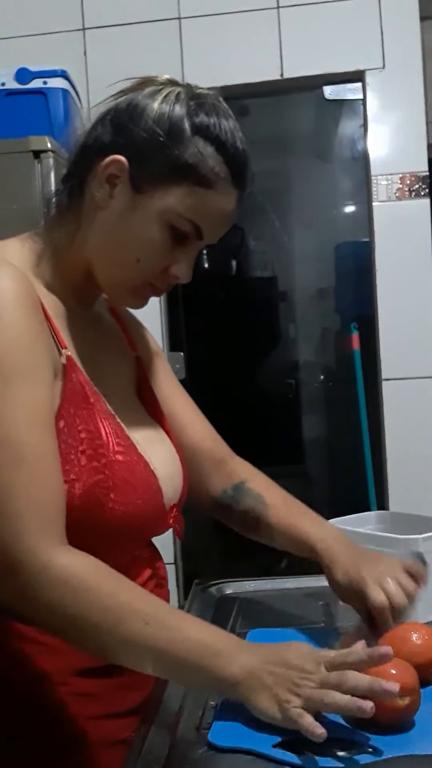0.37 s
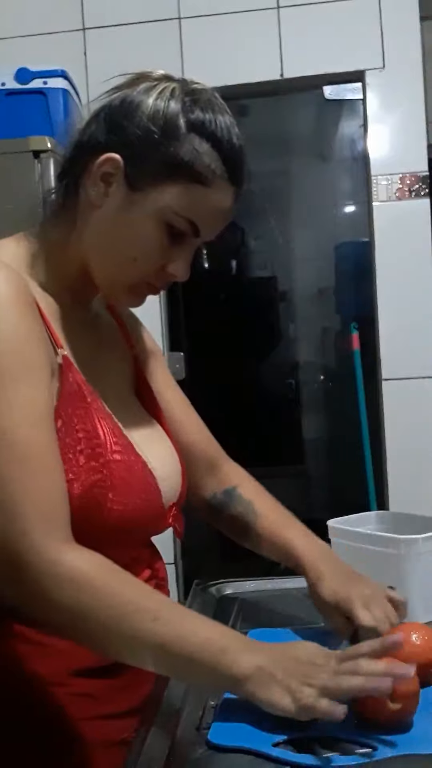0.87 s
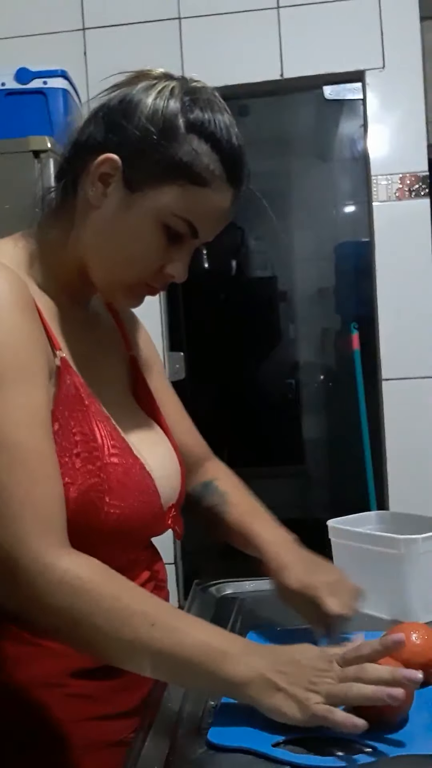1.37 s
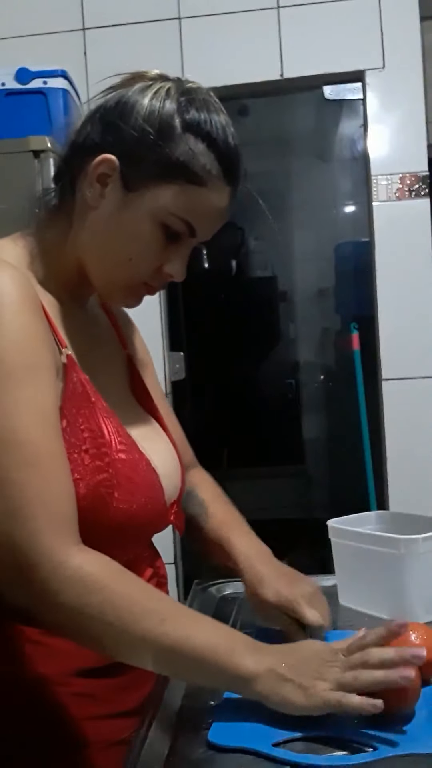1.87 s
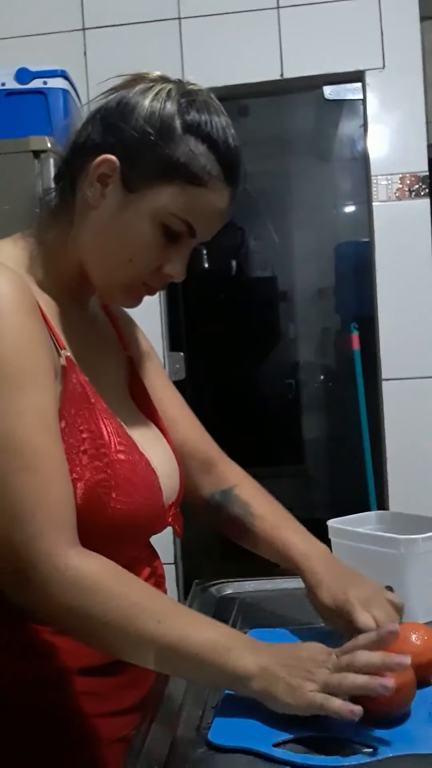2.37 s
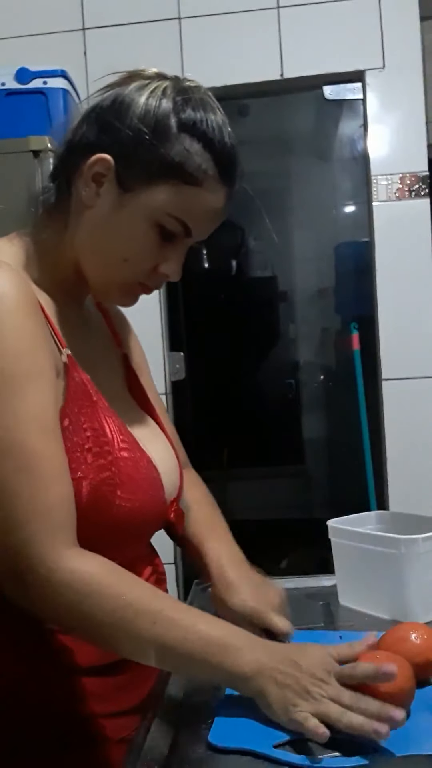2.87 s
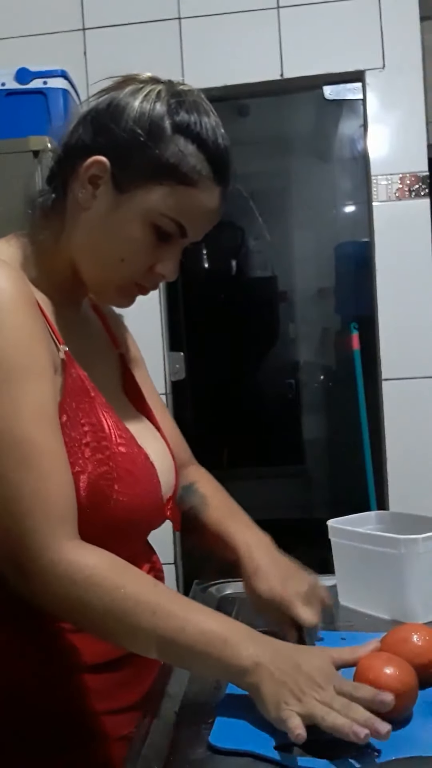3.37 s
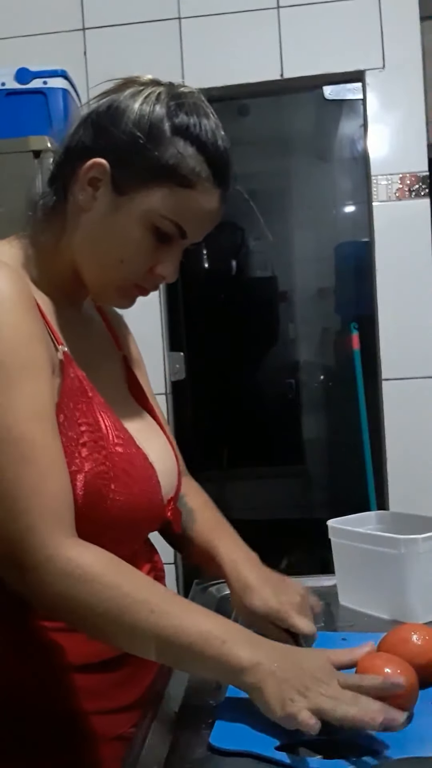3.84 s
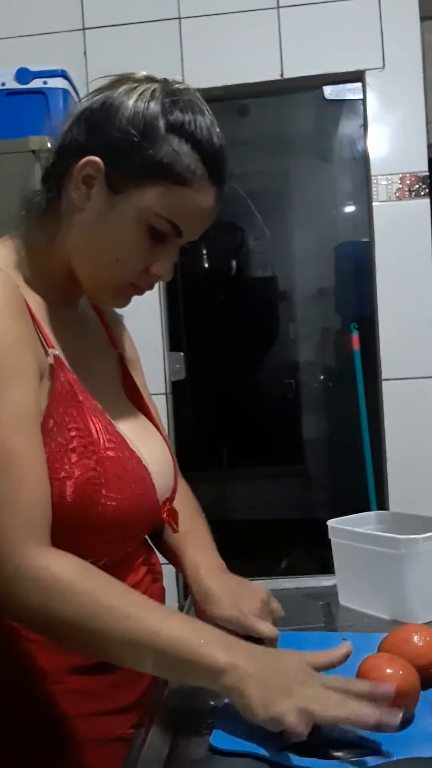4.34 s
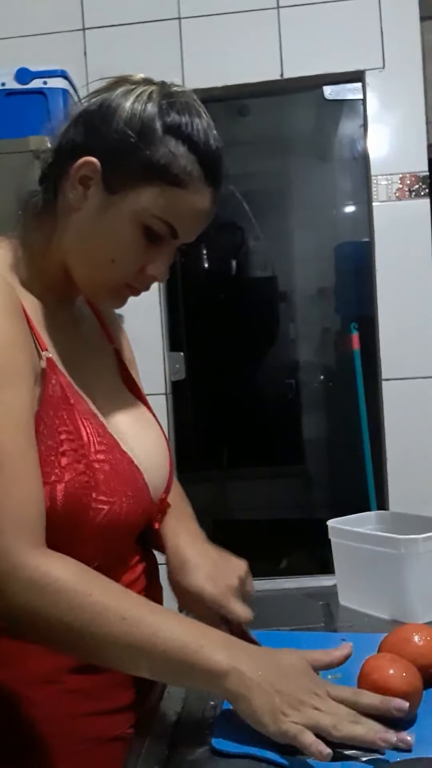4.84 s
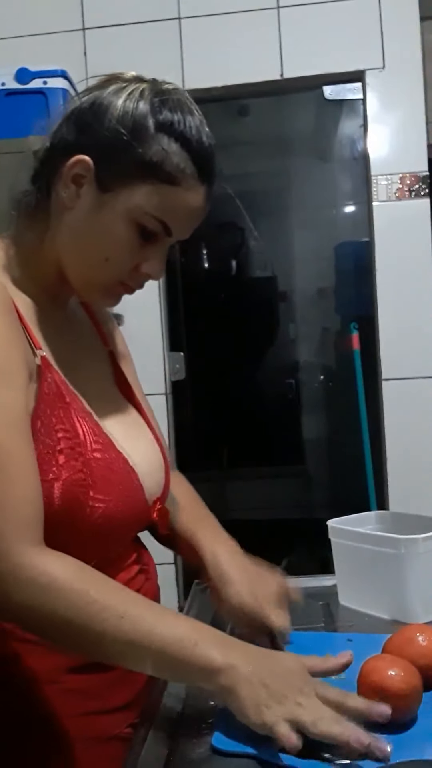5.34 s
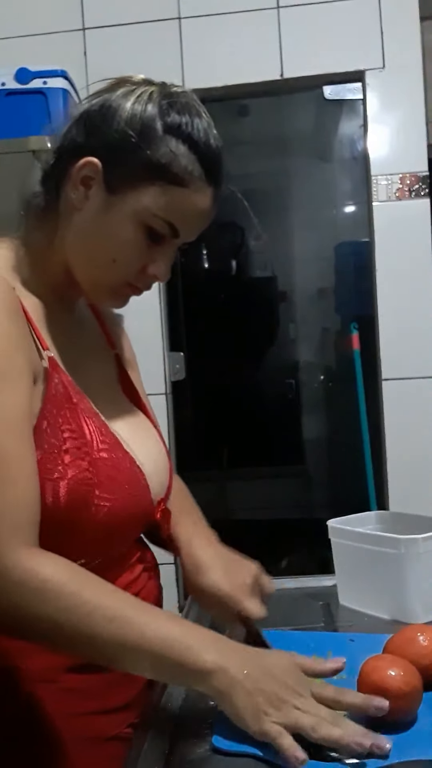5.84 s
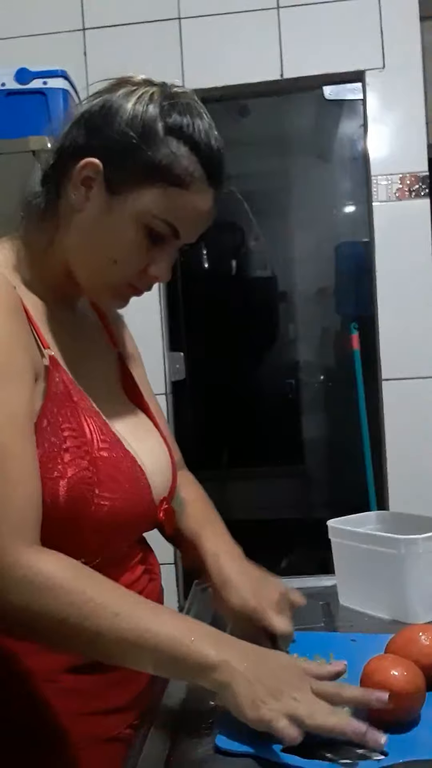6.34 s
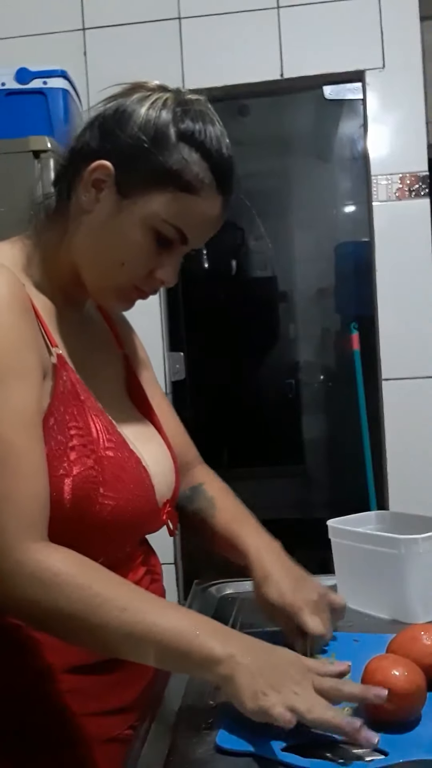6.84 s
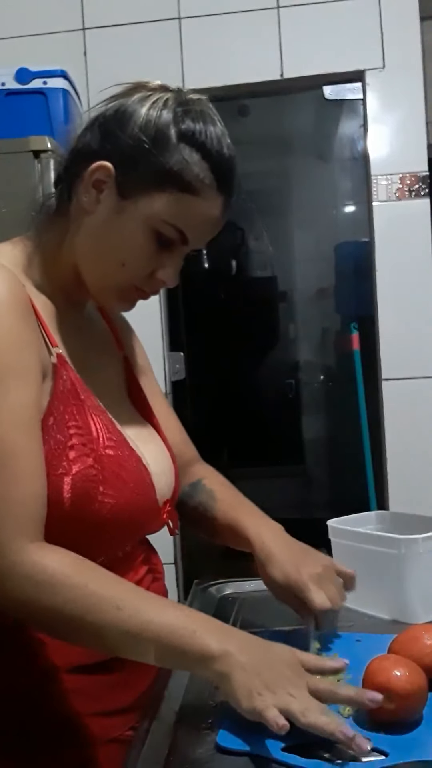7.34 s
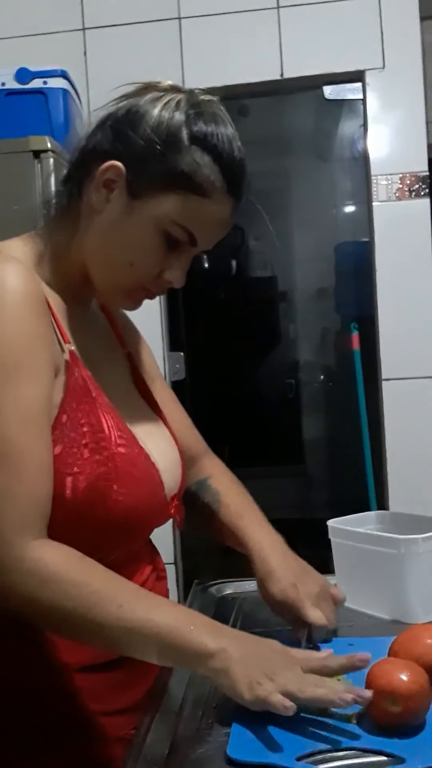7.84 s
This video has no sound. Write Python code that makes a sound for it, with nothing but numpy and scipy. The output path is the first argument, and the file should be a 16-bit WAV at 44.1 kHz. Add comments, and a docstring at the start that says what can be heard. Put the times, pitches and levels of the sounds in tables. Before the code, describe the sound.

Steady close knife chops click and crunch on a plastic cutting board that knocks on a hollow metal sink top in a small tiled kitchen.

```python
"""A knife chops herbs on a thin plastic board lying on a steel sink top, in a small tiled kitchen.
Edge: runs of clicks crack on the board and wake its modes; swelling grains crunch through leaves.
Sink top: the board knocks on the steel, which booms in decaying low modes.
Tiles: a short tail of noise fed by the energy of the clicks and knocks.
Background: slightly wavering room hiss and mains hum."""
import sys
import numpy as np
from scipy import signal
from scipy.io import wavfile

SR = 44100
rng = np.random.default_rng(int(sys.argv[2]) if len(sys.argv) > 2 else 0)


def linear_from_db(decibels):
    """Turn decibels (scalar or array-like) into linear amplitude factors; 0 gives 1."""
    return 10 ** (np.asarray(decibels, float) / 20)


def file_out(sig):
    """Save sig as 16-bit WAV at sys.argv[1]."""
    # one column per channel
    cols = np.atleast_2d(sig).T
    # limit, then scale
    lim = np.clip(cols, -1, 1)
    pcm = np.round(lim * 32767).astype(np.int16)
    wavfile.write(sys.argv[1], SR, pcm)


N = 350595  # samples

# Edge meets board: (time [s], relative level [dB], brightness about 2 kHz [dB/octave],
# pitch of board modes under the landing place [Hz], their level over the crack [dB])
CRACKS = [(.040, -32, 6, 2000, 5), (.0608, -9, -1, 1620, 7), (0.2478, -9.5, -1.5, 1660, 14),
          (0.5408, -45, -8.5, 2000, 10), (0.7394, -10, -0.5, 2230, 9), (0.9225, -34, -3, 2000, 10),
          (0.9371, -22.5, -4.5, 1660, 34), (1.2074, -51, -5, 1960, 8), (1.2145, -26, 2, 2070, 15),
          (1.7085, -10, -0.5, 1470, 27), (1.9003, -27, 5.5, 2000, 5), (1.9142, -11.5, 0, 1940, 8),
          (2.0872, -29.5, 7.5, 2020, 5), (2.0964, -29, 4, 2000, 5), (2.4354, -39, 4, 2030, 14),
          (2.9458, -25.5, 0, 2020, 5), (2.9558, -14.5, -0.5, 1940, 21), (3.1466, -9.5, -1, 2220, 11),
          (3.3588, -14, 0.5, 2090, 21), (3.5376, -9, 0.5, 1470, 19), (3.5486, -19.5, -2.5, 2000, 12),
          (3.7238, -15, -1.5, 1900, 31), (3.8876, -25.5, 4, 2070, 4), (4.0651, -14, 4.5, 2040, 10),
          (4.0696, -9, 0, 2070, 13), (4.3031, -25.5, -3.5, 1960, 13), (4.4075, -34, -4.5, 2000, 8),
          (4.4765, -29, -5, 1690, 15), (4.6391, -17, 2, 2000, 5), (4.6464, -17, -3.5, 1480, 18),
          (4.9873, -37, 9, 2000, 5), (5.226, -12, -2.5, 2000, 3), (5.4201, -26, 3, 1980, 8),
          (5.433, -13, -1, 2600, 23), (5.6184, -10, -1, 1950, 32), (5.9937, -37.5, 7.5, 2000, 5),
          (6.1684, -27.5, 1.5, 2040, 17), (6.2235, -31.5, -5, 2000, 10), (6.347, -10.5, -0.5, 2540, 17),
          (6.5103, -30.5, 3, 2000, 10), (6.5295, -26, -4.5, 1980, 10), (6.6937, -23, -2, 2030, 5),
          (6.7009, -10.5, 0, 2070, 13), (6.8532, -18.5, -1.5, 2040, 19), (7.0368, -18, 0, 1480, 19),
          (7.0479, -20.5, -3.5, 1980, 17), (7.2045, -11, -1, 2145, 30.5), (7.214, -26, -1, 2000, 10),
          (7.7135, -41.5, 5, 2000, 5), (7.779, -19.5, -0.5, 1535, 29)]
# Spectrum of a crack: (frequency [Hz], relative level [dB])
CRACK_COLOUR = [(300, 8), (500, 8), (900, 12.5), (1400, 16.5), (2000, 21.5), (2600, 18), (3300, 17.5),
                (4500, 13.5), (7000, 9.5), (8500, -10.5), (9500, -14), (11000, -2.5), (15000, -3.5),
                (16500, -33)]
# Edge dragged through leaves: (time of loudest crunch [s], 20 dB swell [s], 20 dB fade [s], relative level [dB])
LEAF_DRAGS = [(.54, 0.12, 0.033, -50.5), (0.934, 0.02, 0.1, -45.5), (2.084, 0.02, 0.0086, -43.5),
              (3.9, .01, .022, -40.5), (4.064, .004, .015, -37), (4.398, .027, 0.019, -46),
              (4.997, .029, 0.046, -45), (5.99, 0.11, 0.015, -53), (6.178, 0.015, .012, -44),
              (6.52, 0.057, 0.056, -52.5), (7.47, 0.23, 0.16, -61), (7.79, 0.042, 0.31, -56)]
# Spectrum of the leaf crunch: (frequency [Hz], relative level [dB])
LEAF_COLOUR = [(300, -2), (800, -7.5), (2000, 1.5), (4000, -7), (7500, -11.5), (9500, -29), (15000, -12.5),
               (16500, -34)]
# Modes of board and blade: (frequency [Hz], relative level [dB], t60 before a 0.3 s cap [s])
BOARD_MODES = [(708.6, -24, 0.078), (906, -32, 0.17), (1018, -26, 0.066), (1470, -35, 0.21),
               (1654, -38, 0.14), (1820, -58, 0.24), (1895, -48, 0.44), (1984, -30, 0.055),
               (2073, -29, 0.11), (2530, -38, 0.17), (2180, -36, 0.3), (2246, -43, 0.12),
               (2420, -41.5, 0.13), (2566, -41, 0.061), (3370, -29.5, 0.014)]
# Direct sound, left minus right: (frequency [Hz], level [dB])
BALANCE = [(250, 10), (1000, -8.5), (8000, 6.5), (12000, -4)]
# Board knocks on steel: (time [s], relative level [dB], modes above 158 Hz re main modes [dB])
KNOCKS = [(.056, -14, -4.5), (.244, -12.5, -9), (.542, -25.5, -12), (.737, -17, -4), (.948, -17.5, -15),
          (1.22, -43, -11), (1.71, -17.5, -12), (1.917, -22.5, -10), (2.094, -23, -6.5), (2.436, -47, -18),
          (2.96, -22.5, -13.5), (3.151, -13, -12.5), (3.36, -24.5, -10), (3.536, -20.5, -4.5),
          (3.72, -29.5, -9), (3.889, -26.5, -12.5), (4.064, -17, -10), (4.303, -31, -15), (4.408, -40, -5),
          (4.471, -33, -14), (4.645, -13, -15.5), (5.013, -24.5, -17), (5.23, -12.5, -11),
          (5.439, -18, -16), (5.623, -13, -15), (5.989, -35, -15), (6.178, -24.5, -14), (6.35, -12, -15),
          (6.529, -34.5, -7.5), (6.706, -20, -8), (6.853, -24.5, -13), (7.037, -26.5, -8.5),
          (7.202, -17.5, -6), (7.796, -25, -13.5)]
# Modes of the sink top: (frequency [Hz], relative level [dB], t60 [s])
SINK_MODES = [(67, 9.5, 0.55), (92.2, -1, 0.8), (123.3, -10.5, 0.37), (138.4, -5, 0.13),
              (156.7, -6.5, 0.028), (167.6, -6, 0.29), (187.1, 3, 0.28), (203.1, 0.5, 0.21),
              (239, -6.5, 0.55), (332.4, -4.5, 0.23), (350.7, -4, 0.56), (389.6, -0.5, 0.36),
              (424, 0, 0.088), (458, -12, 0.42), (542.5, -7.5, 0.42), (571.4, -12, 0.2)]
# Spectrum of the knocks as fed to the tiles: (frequency [Hz], relative level [dB])
THUD_COLOUR = [(30, -28), (60, -43), (130, 3), (250, -9.5), (300, -1.5), (500, 1.5), (800, -39),
               (1500, -100)]
# Late tail of the kitchen: (frequency [Hz], t60 [s])
KITCHEN_T60 = [(60, 0.3), (300, 0.69), (1000, 0.45), (3000, 0.41), (8000, 0.4), (16000, 0.18)]
# Left-right correlation of tail and hiss: (frequency [Hz], correlation [-])
LIKENESS = [(60, 1), (200, 0.91), (500, 0.29), (1000, 0.011), (16000, 0.012)]
# Density spectrum of the hiss: (frequency [Hz], relative level [dB])
HISS = [(25, -35), (45, 3), (64, -0.5), (90, -12.5), (130, -6.5), (250, -11.5), (300, -27.5), (400, -11),
        (800, -17.5), (1400, -19.5), (2100, -15.5), (4000, -22), (7500, -20.5), (9500, -40.5),
        (15000, -31.5), (16500, -78)]
# Mains harmonics: (frequency [Hz], relative level [dB])
HUM = [(60, -83), (120, -63.5), (240, -71), (360, -71)]
BAND_EDGES_HZ = 30 * 2 ** np.arange(0, 9.2, 1 / 3)

CHATTER_S, CHATTER_SAMPLES = 0.0065, 1500  # time to fall 20 dB; length of a run
LANDING_OCTAVES = 0.055  # distance from the pitch at which a mode's strike falls to 1/e
# Leaf cut just before each crack; its level follows the crack in part
CUT_LEAD_S, CUT_SWELL_S, CUT_FADE_S = 0.0042, 0.013, 0.0081
CUT_DB, CUT_FOLLOWS = -33.5, 0.61
BARE_START_S, BARE_END_S = 3.45, 4.35  # edge lands on a bare part of the board
STEEL_LAG_S = 0.003  # the board needs a moment to flex down onto the steel
BOUNCE_S, BOUNCE_DB = 0.006597, 6.5  # second strike, re the first
# Modes under 100 Hz follow the knock in part; those over 280 Hz are weaker
DEEP_DB, DEEP_FOLLOWS, TOP_LOSS_DB = -25, 0.77, 2.5
TAIL_DB, EARLY_DB, EARLY_T60_S = -24.5, -18.5, 0.1
HISS_DB = -49.5  # rms in the mix, both channels together
LEFT_MINUS_RIGHT_DB, LEFT_LAG_SAMPLES = -0.8, 5


def at_hz(points, hz):
    """Reads a (Hz, value) table on a log axis."""
    table = np.array(points)
    return np.interp(np.log(hz), np.log(table[:, 0]), table[:, 1])


def butter(x, hz, kind, order=2):
    """Causal Butterworth filter."""
    return signal.sosfilt(signal.butter(order, hz, kind, fs=SR, output="sos"), x)


def grains(size, per_s, spread_db):
    """Tiny clicks of random sign at random moments, a few much larger than the rest."""
    chance, sign, height = rng.random((3, size))
    heights = linear_from_db(-spread_db * np.log(1 - 0.98 * height))
    return (chance < per_s / SR) * np.sign(sign - 0.5) * heights


def ring(clicks, hz, t60_s):
    """Two-pole resonator: a unit click sets a decaying sine of height 1 ringing."""
    r = linear_from_db(-60 / (max(t60_s, 0.01) * SR))
    w = 2 * np.pi * hz / SR
    return signal.lfilter([0, np.sin(w)], [1, -2 * r * np.cos(w), r * r], clicks + 1e-18)


def stereo_bands():
    """Yields index, edges, centre and a partly correlated left-right noise pair for each band."""
    white = rng.standard_normal((2, 2, N))
    for k, (low, high) in enumerate(zip(BAND_EDGES_HZ, BAND_EDGES_HZ[1:])):
        hz = np.sqrt(low * high)
        mid, side = butter(white[k % 2], [low, high], "band")
        alike = np.clip(at_hz(LIKENESS, hz), 0, 1)
        pair = np.sqrt(1 + alike) * mid + np.sqrt(1 - alike) * side * [[1], [-1]]
        yield k, [low, high], hz, pair / np.sqrt(2)


def chatters():
    """For each crack a sharp first touch and a short dying run of clicks; unit energy."""
    fall = linear_from_db(-20 * np.arange(CHATTER_SAMPLES) / SR / CHATTER_S)
    runs = np.array([fall * grains(CHATTER_SAMPLES, per_s=12000, spread_db=0.5) for row in CRACKS])
    runs[:, 0] = 2.7
    return runs / np.sqrt(np.sum(runs ** 2, axis=1, keepdims=True))


def leaves():
    """Grains that swell and fade as the edge goes through the leaves."""
    t, swell = np.arange(N) / SR, np.zeros(N)
    cuts = [(s - CUT_LEAD_S, CUT_SWELL_S, CUT_FADE_S, CUT_DB + CUT_FOLLOWS * db)
            for s, db, *rest in CRACKS if not BARE_START_S < s < BARE_END_S]
    for s, rise_s, fade_s, db in LEAF_DRAGS + cuts:
        near = slice(max(int((s - 3 * rise_s) * SR), 0), int((s + 3 * fade_s) * SR))
        away = np.where(t[near] < s, (s - t[near]) / rise_s, (t[near] - s) / fade_s)
        swell[near] += linear_from_db(db - 20 * away)
    return swell * grains(N, per_s=18000, spread_db=4.0)


def edge(hz, runs, crunch):
    """Clicks of the edge at one frequency; each lands elsewhere on the board and differs a little."""
    out = np.zeros(N + CHATTER_SAMPLES)
    for (s, db, bright_db, *rest), run in zip(CRACKS, runs):
        level_db = db + bright_db * np.log2(hz / 2000) + at_hz(CRACK_COLOUR, hz) + rng.normal(0, 1.5)
        start = round(s * SR)
        out[start:start + CHATTER_SAMPLES] += linear_from_db(level_db) * run
    return out[:N] + linear_from_db(at_hz(LEAF_COLOUR, hz) + 11.0) * crunch


def direct_sound(k, clicks, edges_hz, hz):
    """One band of the clicks, left delayed and balanced against right."""
    direct = (-1) ** k * butter(clicks, edges_hz, "band")  # alternate signs join the bands smoothly
    left = linear_from_db(at_hz(BALANCE, hz)) * np.roll(direct, LEFT_LAG_SAMPLES)
    return np.array([left, direct])


def landings(hz):
    """One click a crack, strong for a mode close to the pitch of that crack."""
    s, db, bright_db, pitch_hz, ring_db = np.transpose(CRACKS)
    clicks = np.zeros(N)
    nearness = np.exp(-(np.log2(hz / pitch_hz) / LANDING_OCTAVES) ** 2)
    clicks[(s * SR).astype(int)] = linear_from_db(db + ring_db) * nearness
    return clicks


def board(runs, crunch):
    """Modes of board and blade, rung by the edge's clicks and by each landing."""
    out = 0
    for hz, db, t60_s in BOARD_MODES:
        gain = linear_from_db(db - 8.0 + rng.normal(0, 1.5, (2, 1)))
        out = out + gain * ring(edge(hz, runs, crunch) + landings(hz), hz, min(t60_s, 0.3))
    return out


def chops():
    """Edge on board: direct clicks and tile tail band by band, then the ringing board."""
    runs, crunch, lumps, out = chatters(), leaves(), early_lumps(), 0
    for k, edges_hz, hz, noise in stereo_bands():
        clicks = edge(hz, runs, crunch)
        out = out + direct_sound(k, clicks, edges_hz, hz) + tiles(clicks, hz, noise, lumps)
    return out + board(runs, crunch)


def knocks(hz):
    """Clicks at the knocks, with the level that reaches this range of modes."""
    s, db, upper_db = np.transpose(KNOCKS)
    clicks = np.zeros(N)
    levels_db = [DEEP_DB + DEEP_FOLLOWS * db, db, db + upper_db, db + upper_db - TOP_LOSS_DB]
    mode_range = np.searchsorted([100, 158, 280], hz)
    clicks[((s + STEEL_LAG_S) * SR).astype(int)] = linear_from_db(levels_db[mode_range])
    return clicks


def sink_top():
    """A soft push and the board's bounce strike every mode, with strengths that change by knock."""
    out = 0
    for k, (hz, db, t60_s) in enumerate(SINK_MODES):
        clicks = knocks(hz)
        clicks[clicks > 0] *= linear_from_db(db - 10.0 + rng.normal(0, 2.4, len(KNOCKS)))
        clicks = clicks + linear_from_db(BOUNCE_DB) * np.roll(clicks, round(BOUNCE_S * SR))
        lean = (-1) ** k * 0.1 * (hz / 200) ** 0.92  # higher modes are less equal left and right
        out = out + ring(clicks, hz, t60_s) * [[1 + lean], [1 - lean]]
    lagged = [np.roll(out[0], LEFT_LAG_SAMPLES), out[1]]
    return butter(butter(lagged, 820, "low"), 54.6, "high")


def dying(power, t60_s):
    """Power that is fed in and dies 60 dB in t60."""
    return signal.lfilter([1], [1, -linear_from_db(-120 / (max(t60_s, 0.005) * SR))], power + 1e-18)


def early_lumps():
    """Random power factor: the early tail comes in lumps."""
    flicker = butter(rng.standard_normal(N), 235, "low")
    return linear_from_db(4.45 * flicker / flicker.std())


def tiles(clicks, hz, noise, lumps):
    """Energy of clicks and knocks scattered by the tiles as noise with an early and a late decay."""
    thuds = linear_from_db(at_hz(THUD_COLOUR, hz) + 34.5) * knocks(hz)
    power = dying(clicks ** 2 + thuds ** 2, 0.038) * linear_from_db(-42.0)
    late = linear_from_db(2 * TAIL_DB) * dying(power, at_hz(KITCHEN_T60, hz))
    early = lumps * linear_from_db(2 * EARLY_DB) * dying(power, EARLY_T60_S)
    return np.sqrt(late + early) * noise


def drift(rate_hz):
    """Slow chance: random points of spread 1 joined by straight lines."""
    points = rng.standard_normal(int(N / SR * rate_hz) + 2)
    return np.interp(np.arange(N) / SR * rate_hz, np.arange(len(points)), points)


def room_hiss():
    """Coloured noise that wavers a little, band by band and as a whole."""
    together, hiss = drift(3), 0
    for k, edges_hz, hz, noise in stereo_bands():
        hiss = hiss + linear_from_db(at_hz(HISS, hz) + 1.2 * together + 1.2 * drift(8)) * noise
    return linear_from_db(HISS_DB) * hiss / hiss.std()


def mains_hum():
    """Steady sines at mains harmonics, equal left and right."""
    t = np.arange(N) / SR
    return sum(linear_from_db(db + 5.0) * np.sin(2 * np.pi * hz * t) for hz, db in HUM)


def background():
    """Room hiss with a little mains hum."""
    return room_hiss() + mains_hum()


def scene():
    """Chops and knocks over the background, with the left-right offset."""
    sides_db = np.array([[LEFT_MINUS_RIGHT_DB / 2], [-LEFT_MINUS_RIGHT_DB / 2]])
    return (chops() + sink_top() + background()) * linear_from_db(sides_db)


def low_pass(x):
    """Removes everything above the highest recorded frequency."""
    return signal.sosfilt(signal.butter(12, 16990, fs=SR, output="sos"), x)


def record(dry):
    """Cuts rumble and extreme treble."""
    no_rumble = butter(dry, 51.3, "high", order=4)
    mix = butter(no_rumble, 15900, "low", order=12)
    return low_pass(mix)


dry = scene()
out = record(dry)
file_out(out)
```